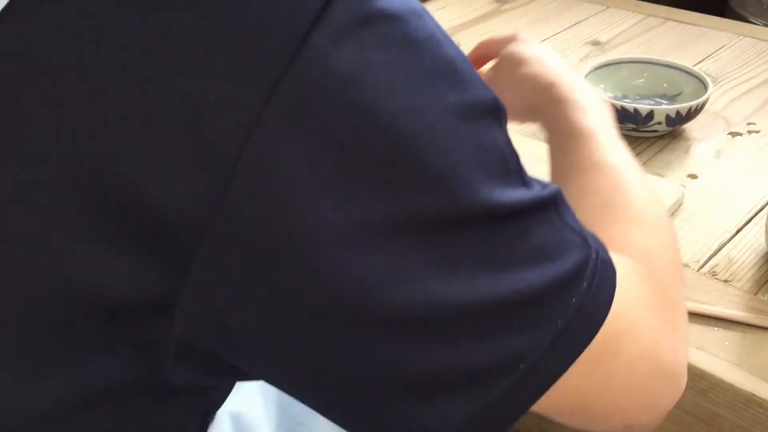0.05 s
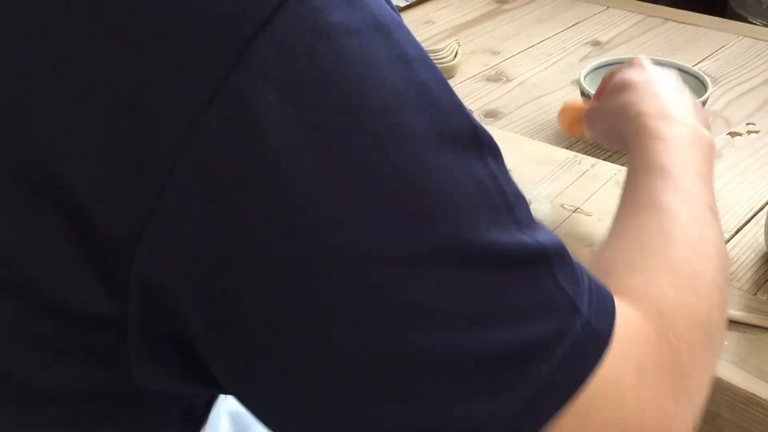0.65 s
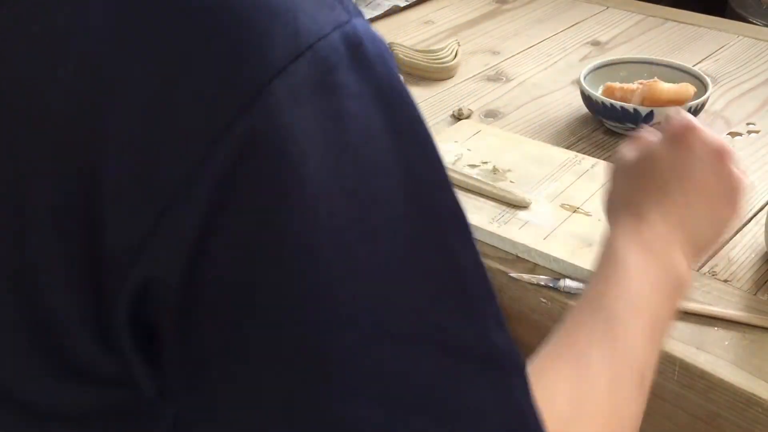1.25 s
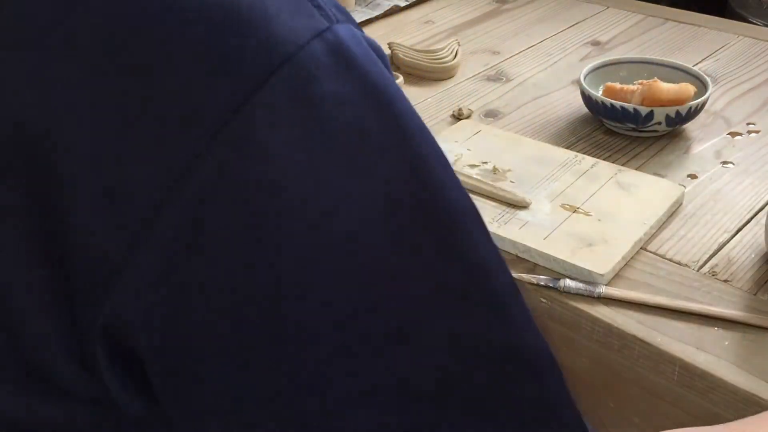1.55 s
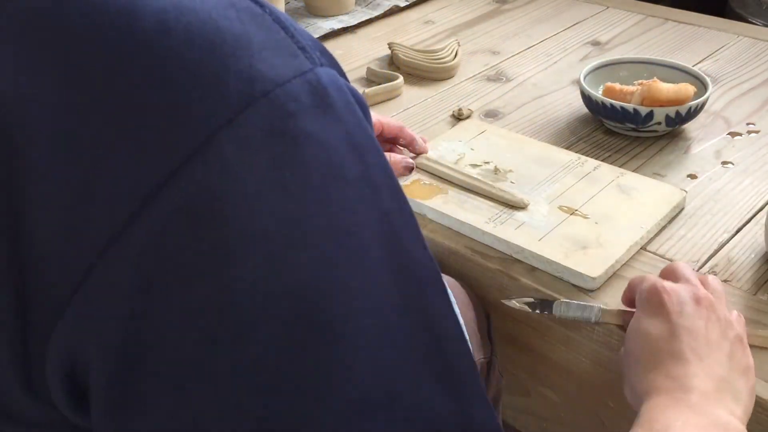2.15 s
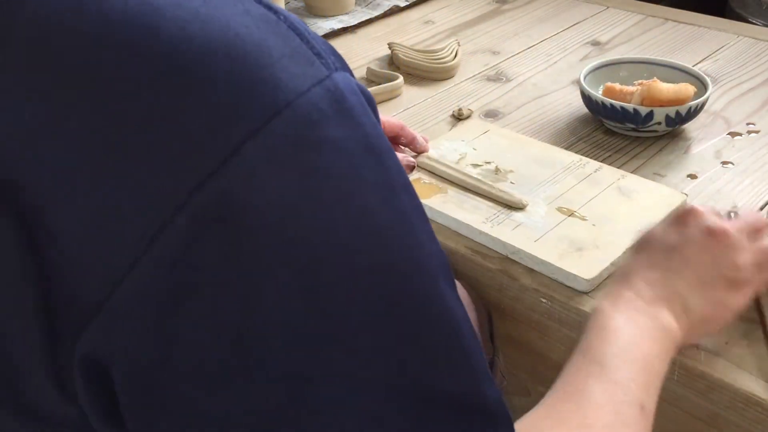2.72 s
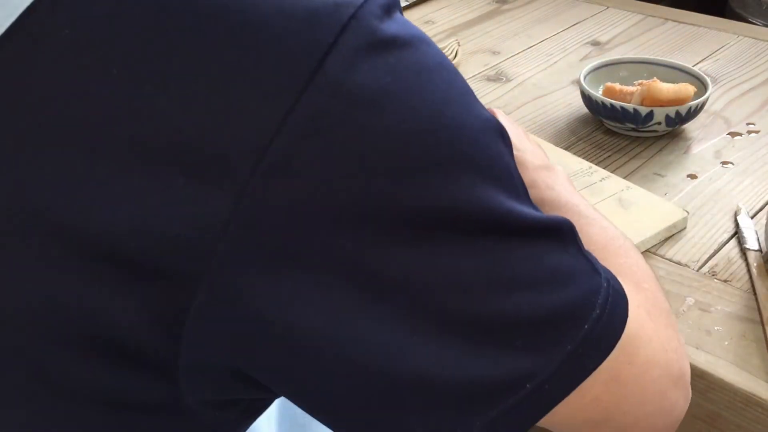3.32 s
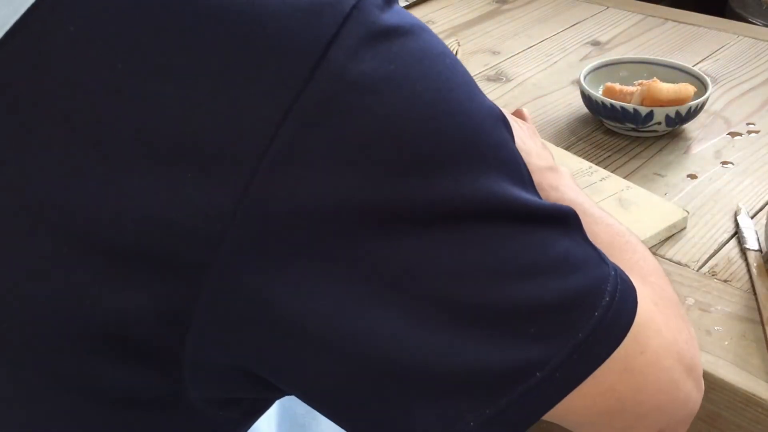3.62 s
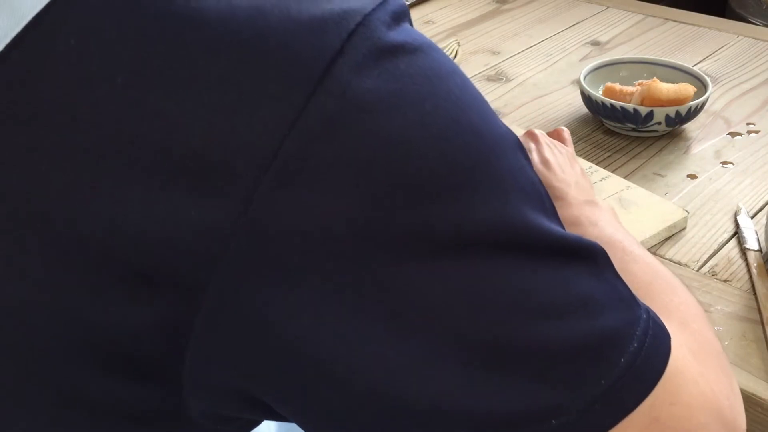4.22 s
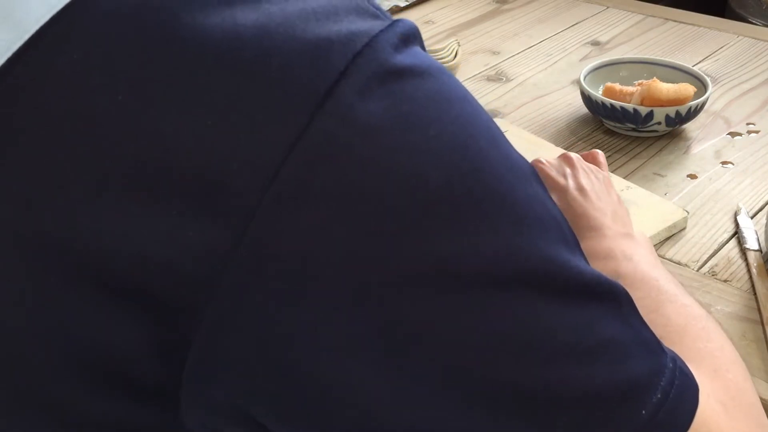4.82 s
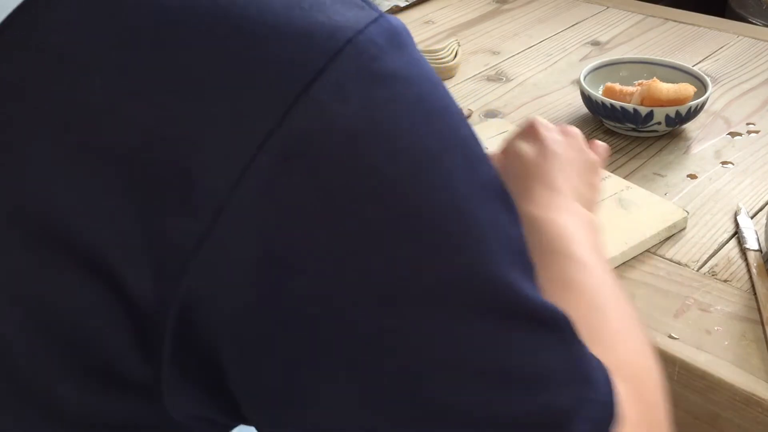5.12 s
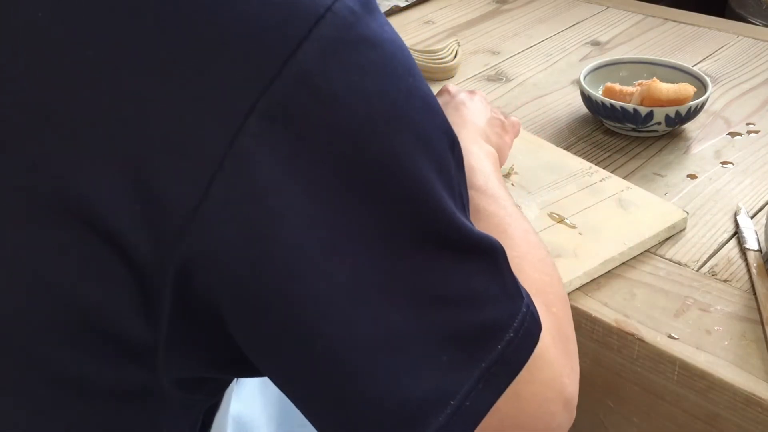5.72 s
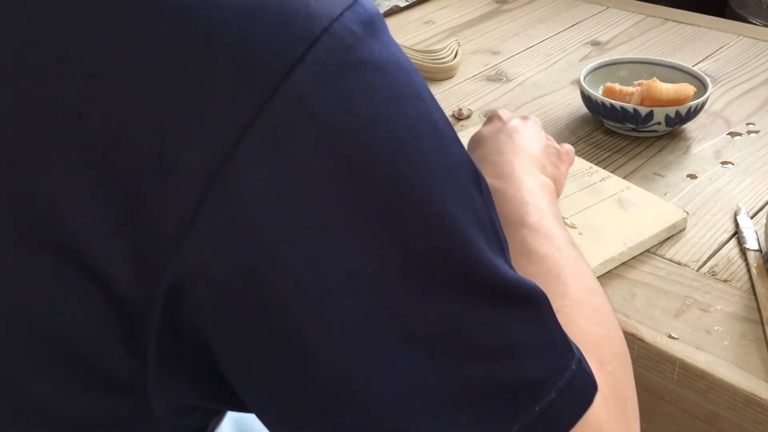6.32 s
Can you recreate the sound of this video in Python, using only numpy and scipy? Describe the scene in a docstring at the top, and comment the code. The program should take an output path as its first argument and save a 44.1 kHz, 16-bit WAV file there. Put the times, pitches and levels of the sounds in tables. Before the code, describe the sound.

A quiet room holds a low rumble and light hiss, and a distant pendulum clock ticks faintly from start to end, a little under twice a second. In the first second a sleeve rustles softly. A few faint squeaks and a tiny click follow between 1 and 1.6 seconds. At about 2.3 seconds a steel knife slides off the edge of a nearby wooden workbench with light hollow knocks and a gritty scrape, giving a sharp clack at 2.4 seconds. Just before 2.9 seconds it drops onto the planks, the loudest moment: the wood knocks, the handle chatters, and the blade bounces, rings briefly and rattles to rest by 3.3 seconds. Faint far squeaks come around 3.6 and 6.4 seconds, and soft pushes on the bench between 5.3 and 6.1 seconds. The bench sounds close and fairly dry.

```python
"""In a quiet room with a low rumble, a far pendulum clock ticks faintly from start to end.
First a sleeve rustles as a potter reaches across a wooden bench. With light knocks and a gritty slide,
a steel knife comes off the front edge, giving a sharp clack at 2.4 s. Just before 2.9 s it drops on
the planks: the wood knocks, the handle chatters, and the blade bounces, rings and rattles to rest.
After that, only a few faint squeaks and soft pushes on the bench join the clock."""
import sys
import numpy as np
from scipy import signal
from scipy.fft import rfft, irfft
from scipy.io import wavfile
from scipy.ndimage import uniform_filter1d

SR = 44100
rng = np.random.default_rng(int(sys.argv[2]) if len(sys.argv) > 2 else 0)


def generate_wav(signal):
    """Clip the signal to [-1, 1] and save it as 16-bit WAV at the path in sys.argv[1]."""
    frames = np.transpose(np.atleast_2d(signal))
    scaled = np.clip(frames, -1, 1) * 32767
    pcm = np.round(scaled).astype(np.int16)
    wavfile.write(sys.argv[1], SR, pcm)


N = 284886
TIME = np.arange(N) / SR  # seconds through the whole scene
RING = np.arange(SR // 2) / SR  # seconds through one short sound
FREQS = np.fft.rfftfreq(N, 1 / SR)

# The blade's touches and bounces. A higher tilt makes a sound brighter.
# Each row: start in seconds, level in dB, tilt in dB per octave.
BOUNCES = [(2.256, -35, 1), (2.268, -37.5, 12), (2.3863, -24, 0), (2.8902, -7.5, -2.5), (2.922, -9.5, -3.5),
           (2.944, -13.5, -3.5), (2.961, -13, 17), (2.9888, -11.5, -0.5), (3.023, -19, 5.5),
           (3.034, -5.5, 8), (3.042, -12, 3), (3.0511, -10.5, 2.5), (3.107, -15, 2), (3.114, -18, 4.5),
           (3.159, -27, -1.5), (3.2637, -30.5, -2)]


def knife(crack_db=-4, crack_t60=0.026):
    """Every bounce is a brief crack and a ring of steel, cut short by the wood."""
    # The blade's tones. Each row: pitch in Hz, level in dB, t60 (seconds to fade by 60 dB).
    blade_tones = [(2077, -15.5, 0.091), (2475, -11.5, 0.079), (2790, -11.5, 0.039), (3377, -11.5, 0.044),
                   (4230, -33, 0.015), (4760, 0, 0.036), (4840, 9.5, 0.015), (6860, -0.5, 0.027),
                   (7400, -17, .025), (7840, -23, 0.016), (8260, 0.5, 0.022), (9610, -1, 0.017),
                   (9850, -14, 0.022), (11200, -23, 0.016), (11980, -5, 0.0087), (12330, -11, 0.013),
                   (13700, -16, .018), (14900, -19, 0.012)]
    # The crack of contact. Each row: frequency in Hz, level in dB.
    crack_colour = [(1000, -13), (2500, -2.5), (5000, -1.5), (6100, -0.5), (7000, 0), (9700, -5),
                    (10400, -1), (12200, -8), (14400, -27), (16000, -0.5)]
    out = np.zeros(N)
    for start, db, tilt_db in BOUNCES + rattle():
        crack = unit(colour(burst(crack_t60), crack_colour, tilt_db))
        steel = ring(blade_tones, tilt_db, scatter_db=4)
        add(out, start, amp(db) * unit(steel + amp(crack_db) * crack))
    return out


def rattle(start_s=3.063, gap_s=0.0115, jitter_s=0.00092, first_db=-19, fade_db_per_s=73, tilt_db=-4.5):
    """The settling blade makes six light, uneven, fading hops, given as rows like those of BOUNCES."""
    hops = []
    for k, (late, hard) in enumerate(rng.standard_normal((6, 2))):
        db = first_db - fade_db_per_s * k * gap_s + 0.5 * hard
        hops.append((start_s + k * gap_s + jitter_s * late, db, tilt_db))
    return hops


def bench(recoil_db=-8, recoil_loss=0.5, recoil_tilt_db=-2, weak_db=-4, weak_t60=0.077):
    """Blows and bounces ring the planks, pushes sway them, and the front edge rings hollow."""
    # The wooden handle lands. Each row: start in seconds, level in dB, tilt in dB per octave.
    blows = [(2.8708, -2, -1), (2.879, -12.5, -6), (2.935, -17, -1), (2.950, -14, 3), (3.029, -12, 4.5)]
    # Soft pushes. Each row: start in seconds, level in dB, pitch in Hz, length in seconds.
    pushes = [(1.575, -31.5, 153, 0.017), (2.250, -14, 145, 0.055), (2.397, -15.5, 151, 0.037),
              (2.440, -23.5, 158, 0.028), (2.885, -8.5, 164.7, 0.0365), (5.29, -28, 90, 0.037),
              (5.635, -28, 228.5, 0.037), (6.025, -25, 80, 0.047), (6.12, -29, 81, .05)]
    # The planks' main tones. Each row: pitch in Hz, level in dB, t60 in seconds.
    plank_tones = [(99, -18, 0.49), (154.8, -7, 0.21), (178, -20, 0.107), (205, -6, 0.18),
                   (277.3, -11, 0.14), (331, -4, 0.042), (366.5, -6.5, 0.12), (540, -4, 0.07),
                   (680, 0, 0.06), (745, -8.5, .09), (878, -12, 0.12), (990, 3, 0.038), (1040, -8, 0.14),
                   (1094, -3, 0.13), (1193, 4, 0.029), (1624, -12, 0.17), (1725, -26.5, .05),
                   (1900, -24, 0.06)]
    # The wood's many weaker tones, blurred into noise. Each row: frequency in Hz, level in dB.
    wood_colour = [(20, -66), (60, -24), (100, -17), (180, 2.5), (350, -1), (450, 0), (700, -1.5),
                   (1100, -2.5), (1700, -11), (2200, -19), (3200, -28), (6000, -31), (16000, -43)]
    # Light knocks on the front edge. Each row: start in seconds, level in dB, tilt in dB per octave.
    knocks = [(2.258, -26, 9), (2.2655, -22, -2.5), (2.271, -26.5, 5), (2.392, -22, 11.5), (2.399, -19, 3),
              (2.441, -22, -5.5)]
    # The front edge's tones. Each row: pitch in Hz, level in dB, t60 in seconds.
    edge_tones = [(161, -1.5, 0.053), (338, -4, 0.043), (517, -2.5, 0.064), (626, 0, 0.12),
                  (690, -2, 0.082), (760, -6.5, 0.13), (900, -1.5, 0.048), (1404, -6, 0.033),
                  (1620, -15, 0.043), (1970, -17, 0.027), (2280, -18, 0.028), (2610, -14, 0.019),
                  (2920, -13, 0.019)]
    out = swells(pushes)
    # Every bounce shakes the planks too; bright touches of the tip shake them less.
    recoils = [(start, db + recoil_db - recoil_loss * tilt_db, recoil_tilt_db)
               for start, db, tilt_db in BOUNCES]
    for start, db, tilt_db in blows + recoils:
        weak_tones = unit(colour(burst(weak_t60), wood_colour, tilt_db))
        planks = ring(plank_tones, tilt_db)
        add(out, start, amp(db) * unit(planks + amp(weak_db) * weak_tones))
    for start, db, tilt_db in knocks:
        add(out, start, amp(db) * ring(edge_tones, tilt_db))
    return out


def chatter(level_db=-8, start_s=2.915, peak_s=2.952, fade_t60=0.62, taps_per_s=420, tap_t60=0.014):
    """The wooden handle rocks on the planks between bounces: a flurry of tiny taps that dies away."""
    # Wood tapping wood. Each row: frequency in Hz, level in dB.
    tap_colour = [(40, -43), (100, -1), (170, 0), (330, -0.5), (450, -26), (850, -13), (1100, 5),
                  (1400, -2), (1600, 4.5), (2060, 0), (2700, -9.5), (4000, -11), (8000, -31), (16000, -38)]
    rise = np.clip((TIME - start_s) / (peak_s - start_s), 0, 1)
    fade = dying(fade_t60, np.maximum(TIME - peak_s, 0))
    touches = rng.random(N) < taps_per_s / SR
    force = rng.uniform(0.13, 1, N) * rng.choice([-1, 1], N)
    taps = signal.fftconvolve(rise * fade * touches * force, burst(tap_t60))[:N]
    return amp(level_db) * unit(colour(taps, tap_colour))


def clacks(tail_db=-5, tail_t60=0.033, handle_db=-16):
    """Tool hits tool: one hard spike with a noisy tail, then the short ring of the handles."""
    # The dry hits. Each row: start in seconds, level in dB, tilt in dB per octave.
    hits = [(1.574, -34.5, 2), (2.387, -25, 3), (2.43, -3, 1.5), (2.4397, -21.5, -6), (2.443, -14, -1.5),
            (2.951, -15, -9.5), (2.9547, -13, -10)]
    # The colour of a clack. Each row: frequency in Hz, level in dB.
    clack_colour = [(30, -69), (90, -40), (170, -18), (1100, -25), (1400, 2), (1900, 1.5), (3200, -3.5),
                    (4400, -1), (4650, 5.5), (5000, -2.5), (6600, 1.5), (8000, -7), (10000, -11.5),
                    (12000, -27), (16000, -32)]
    # The handles' tones. Each row: pitch in Hz, level in dB, t60 in seconds.
    handle_tones = [(1830, -16, 0.079), (1890, -3, .08), (2700, -7, 0.077), (4690, -5, 0.081)]
    out = np.zeros(N)
    for start, db, tilt_db in hits:
        contact = signal.unit_impulse(len(RING)) + amp(tail_db) * burst(tail_t60)
        clack = unit(colour(contact, clack_colour, tilt_db))
        add(out, start, amp(db) * (clack + amp(handle_db) * ring(handle_tones, tilt_db)))
    return out


def slides(rise_share=0.11, grit_db=2.5):
    """Hand and tool slide: the rubbing makes a gritty hiss that starts quickly and trails off."""
    # Each row: start in seconds, level in dB, length in seconds, tilt in dB per octave.
    strokes = [(1.216, -40.5, 0.073, 9), (2.26, -34.5, .15, 14), (2.342, -29.5, 0.15, 4),
               (2.56, -26.5, 0.032, -1)]
    # The rubbing hiss. Each row: frequency in Hz, level in dB.
    rub_colour = [(200, -24), (1500, -8.5), (3000, -1), (4500, -4), (7500, -1.5), (11000, -11), (12500, -5),
                  (13800, -13), (16000, -15)]
    out = np.zeros(N)
    for start, db, length, tilt_db in strokes:
        stroke = (1 - np.exp(-RING / (rise_share * length))) * np.exp(-(RING / length) ** 2)
        grit = amp(grit_db * wobble(len(RING), smooth_samples=90))
        rubbing = stroke * grit * rng.standard_normal(len(RING))
        add(out, start, amp(db) * unit(colour(rubbing, rub_colour, tilt_db)))
    return out


def sleeve(level_db=-68, middle_s=0.31, width_s=0.35, flutter_db=2):
    """The sleeve rustles softly as the arm reaches across the bench."""
    # Rubbing cloth. Each row: frequency in Hz, level in dB.
    cloth_colour = [(30, -23), (100, 2.5), (250, -2.5), (450, -14.5), (700, -9), (1600, -12.5),
                    (3000, -26.5), (12000, -42)]
    flutter = amp(flutter_db * wobble(N, smooth_samples=2000))
    cloth = colour(rng.standard_normal(N), cloth_colour) * flutter
    reach = np.exp(-((TIME - middle_s) / width_s) ** 2)
    return amp(level_db) * cloth / cloth.std() * reach


def clock(first_beat_s=0.383, beat_s=0.5761, case_t60=0.026, contact_s=0.012, grit_db=-11):
    """Two catches, rocked by the pendulum, scrape and drop on a toothed wheel in turn, ringing the case."""
    # The case's tones. Each row: pitch in Hz, level on the tick in dB, level on the tock in dB.
    case_tones = [(977, -11, -3), (1114, 1, -4), (1422, -8.5, -0.5), (1667, -15, -4), (1821, -6, -0.5),
                  (2035, -25, 4.5), (2080, -5, 6), (2327, -13, -1.5), (2530, -3, -0.5)]
    # The relative strength of each beat in dB, tock and tick in turn.
    beat_levels = [-33, -30.5, -36, -29, -32, -30.5, -29.5, -27.5, -31, -25.5, -29.5]
    # The scrape. Each row: frequency in Hz, level in dB.
    grit_colour = [(700, -27), (1100, 10), (2500, -15), (3300, -7), (9000, -22)]
    out = np.zeros(N)
    scrape = np.exp(-(RING / contact_s) ** 4)
    swell = signal.fftconvolve(scrape, dying(case_t60))[:len(RING)]
    hz, tick_db, tock_db = np.transpose(case_tones)
    for k, db in enumerate(beat_levels):
        tones = np.sin(2 * np.pi * (hz[:, None] * RING + rng.random((len(hz), 1))))
        case = unit(swell * (amp(tick_db if k % 2 else tock_db) @ tones))
        grit = unit(colour(scrape * rng.standard_normal(len(RING)), grit_colour))
        add(out, first_beat_s + k * beat_s, amp(db) * (case + amp(grit_db) * grit))
    return out


def squeaks():
    """Faint, far squeaks: short tones with a rough pitch."""
    # Each row: start in seconds, relative level in dB, pitch in Hz, length in seconds.
    squeak_tones = [(1.105, -33, 1390, 0.028), (1.335, -39.5, 3000, 0.041), (2.72, -37, 2150, .08),
                    (3.61, -38.5, 1210, .05), (3.66, -35, 1683, 0.033), (6.40, -37.5, 1484, 0.049)]
    return swells(squeak_tones, rough=0.89)


def air(split_hz=480, waver_db=1.25, hiss_db=-70.8):
    """Room noise: a wavering low rumble under a steady hiss."""
    # The room's noise. Each row: frequency in Hz, relative level in dB.
    air_colour = [(15, -58), (25, -20.5), (58, -2.5), (87, 1), (170, -7), (229, -6.5), (439, -19),
                  (714, -22), (1130, -20), (1560, -22), (2760, -25.5), (4600, -29.5), (12000, -35.5),
                  (16000, -40.5)]
    # The rumble's slow drift. Each row: time in seconds, level in dB.
    rumble_levels = [(0, -63), (1.2, -66), (3.3, -65.5), (3.8, -67.5), (4.9, -68), (5.3, -65), (6.46, -65)]
    low_share = 1 / (1 + (FREQS / split_hz) ** 8)
    spectrum = rfft(rng.standard_normal(N)) * amp(read(air_colour, FREQS))
    rumble = irfft(spectrum * low_share, N)
    hiss = irfft(spectrum * (1 - low_share), N)
    rumble_db = np.interp(TIME, *np.transpose(rumble_levels)) + waver_db * wobble(N, smooth_samples=4000)
    return rumble / rumble.std() * amp(rumble_db) + hiss / hiss.std() * amp(hiss_db)


def wash(centre_hz=1020, width_hz=190, level_db=-81.5, swing_db=4.5, crest_s=0.41, period_s=5.7):
    """A far rushing sound that slowly comes and goes."""
    band = 1 / (1 + ((FREQS - centre_hz) / width_hz) ** 2)
    noise = irfft(rfft(rng.standard_normal(N)) * band, N)
    wave = np.cos(2 * np.pi * (TIME - crest_s) / period_s)
    return noise / noise.std() * amp(level_db + swing_db * wave)


def room(x, delay_s=0.0047, bass_hz=170):
    """Many echoes blend, each frequency dying at its own speed; little deep bass comes back."""
    # How long the room rings. Each row: frequency in Hz, t60 in seconds.
    echo_times = [(100, 0.16), (400, 0.43), (1000, 0.28), (3000, 0.33), (7000, 0.22), (15000, 0.22)]
    echoes = rng.standard_normal(len(RING)) * (RING > delay_s)
    hz, t, bands = signal.stft(echoes, SR, nperseg=256)
    tail = signal.istft(bands * dying(read(echo_times, hz)[:, None], t), SR, nperseg=256)[1]
    tail = signal.sosfilt(signal.butter(2, bass_hz, "high", fs=SR, output="sos"), tail)
    return signal.fftconvolve(x, unit(tail))[:N]


def ring(tones, tilt_db, scatter_db=2):
    """A struck object rings with its own tones; their strengths vary with where it is hit."""
    luck = rng.standard_normal(len(tones))
    out = np.zeros(len(RING))
    for k, (hz, db, t60) in enumerate(tones):
        strength = amp(db + tilt_db * np.log2(hz) + scatter_db * luck[k])
        out += (-1) ** k * strength * np.sin(2 * np.pi * hz * RING) * dying(t60)
    return unit(out)


def swells(rows, rough=0, grain_s=0.0061):
    """Short tones that swell and fade; roughness blurs their pitch."""
    out = np.zeros(N)
    for start, db, hz, length in rows:
        t = np.arange(0, length, 1 / SR)
        wander = rough * np.cumsum(rng.standard_normal(len(RING)))[:len(t)] / np.sqrt(grain_s * SR)
        tone = np.sin(2 * np.pi * hz * t + wander)
        add(out, start, amp(db) * unit(np.sin(np.pi * t / length) * tone))
    return out


def colour(x, points, tilt_db=0, size=4096):
    """Shapes a sound's lows and highs to follow a table, tilted by so many dB an octave."""
    hz = np.fft.rfftfreq(size, 1 / SR)
    db = read(points, hz) + tilt_db * np.log2(np.maximum(hz, points[0][0]))
    cepstrum = irfft(np.log(amp(db - db.max()) + 1e-6))
    # Folding onto the first half keeps the filter from sounding before the hit.
    cepstrum[1:size // 2] *= 2
    cepstrum[size // 2 + 1:] = 0
    return signal.fftconvolve(x, irfft(np.exp(rfft(cepstrum))))[:len(x)]


def dying(t60, t=RING):
    """A fade that falls 60 dB every t60 seconds."""
    return np.exp(-np.log(1000) * t / t60)


def burst(t60):
    """Noise that dies away."""
    return unit(rng.standard_normal(len(RING)) * dying(t60))


def wobble(count, smooth_samples):
    """A smooth random curve that typically strays by about 1."""
    curve = uniform_filter1d(rng.standard_normal(count), size=smooth_samples)
    return curve / curve.std()


def amp(db):
    """Turns decibels into a multiplier."""
    return 10 ** (np.asarray(db) / 20)


def unit(x):
    """Scales a sound to energy 1."""
    return x / np.sqrt(np.sum(x ** 2) + 1e-20)


def read(points, hz):
    """Reads between a table's rows, with octaves evenly spaced."""
    f, value = np.transpose(points)
    return np.interp(np.log(hz + 1), np.log(f + 1), value)


def add(mix, start_s, sound):
    """Mixes a sound in at its start time."""
    part = mix[max(round(start_s * SR), 0):][:len(sound)]
    part += sound[:len(part)]


def scene():
    """The bench is near and fairly dry; the clock and squeaks are far and blurred by the room."""
    wood = bench() + chatter()
    steel = knife()
    tools = clacks() + slides()
    far = clock() + squeaks()
    echoes = room(amp(-6.5) * wood + amp(-12.5) * steel + amp(-13.5) * tools + amp(-7) * far)
    return (wood + steel + tools + amp(-6) * far + echoes + air() + wash() + sleeve())[None]


def record(dry, top_hz=15950):
    """The microphone softens three narrow treble bands, then the very highest treble is cut."""
    # Each row: centre in Hz, half width in Hz, level change in dB.
    dips = [(4910, 250, -3), (7700, 430, -2), (10460, 320, -5.5)]
    dip_db = sum(db * np.exp(-((FREQS - hz) / width) ** 2) for hz, width, db in dips)
    heard = irfft(rfft(dry) * amp(dip_db), N)
    treble_cut = signal.firwin(511, top_hz, window=("kaiser", 9), fs=SR)
    return signal.oaconvolve(heard, treble_cut[None], "same")


dry = scene()
out = record(dry)
generate_wav(out)
```